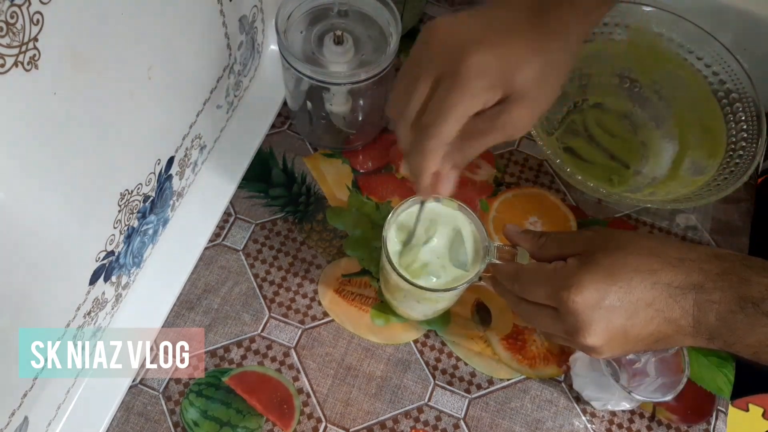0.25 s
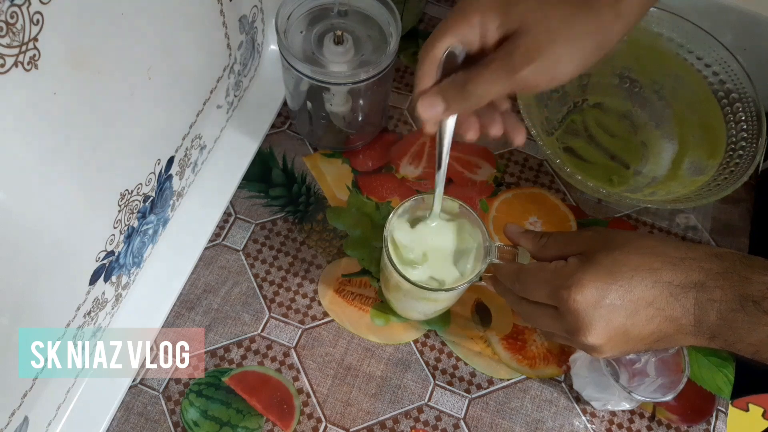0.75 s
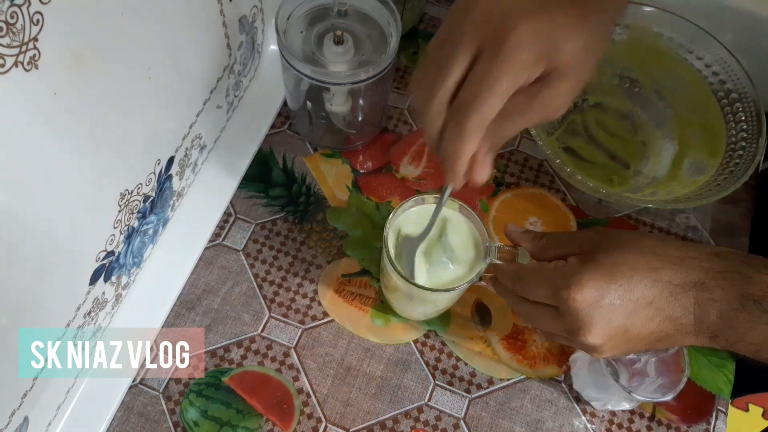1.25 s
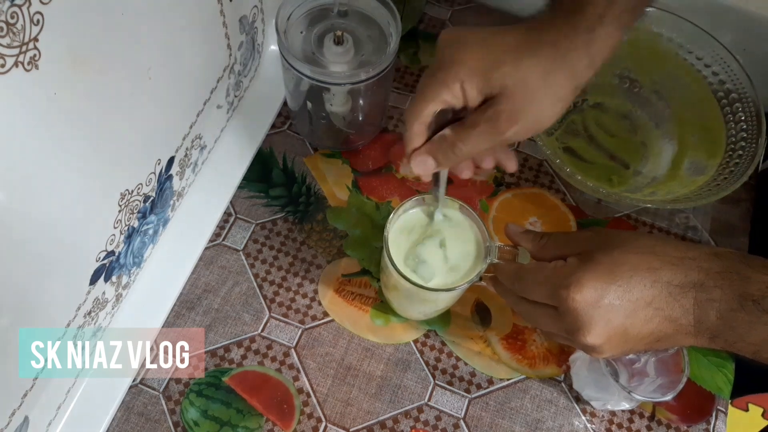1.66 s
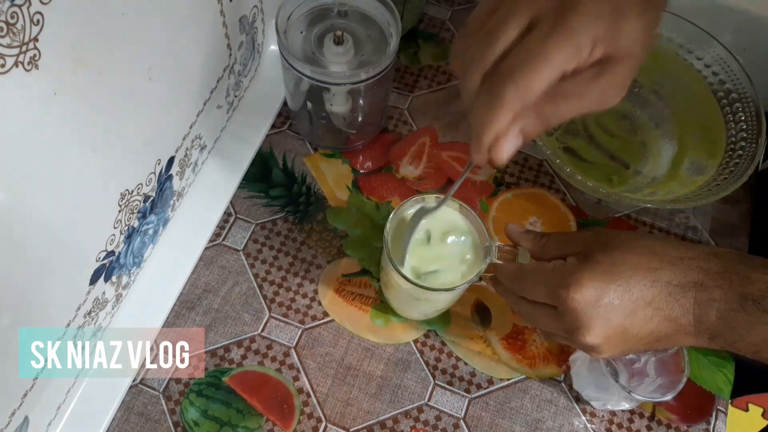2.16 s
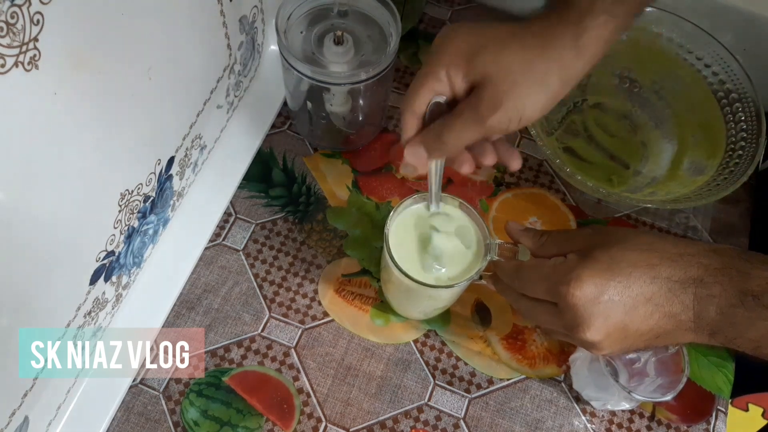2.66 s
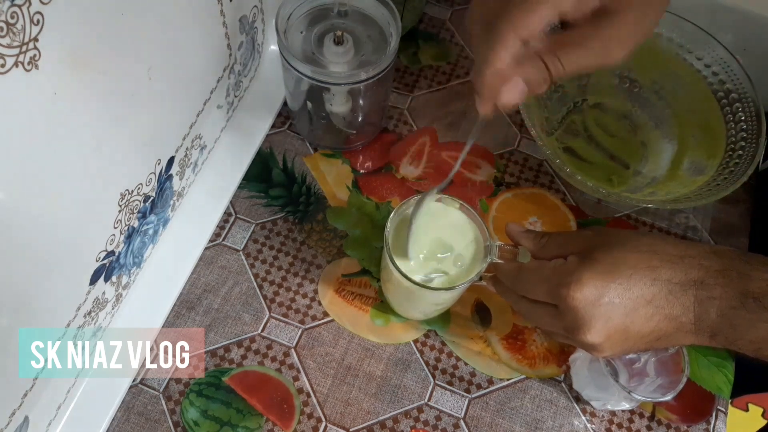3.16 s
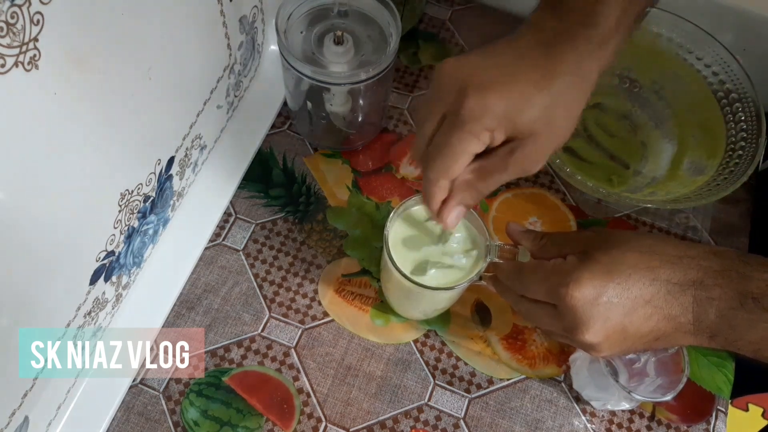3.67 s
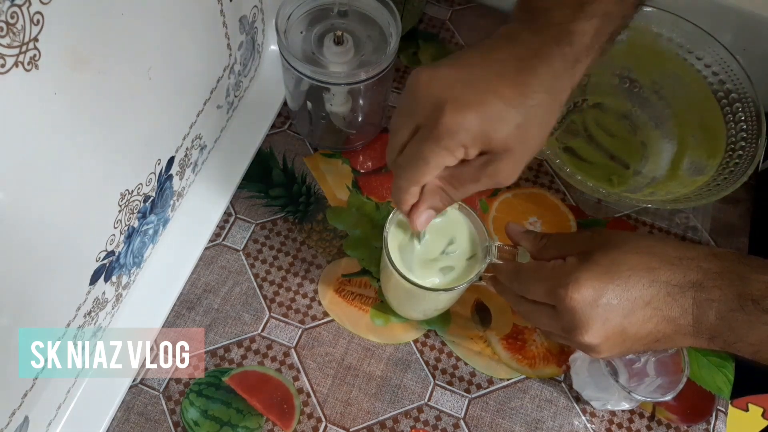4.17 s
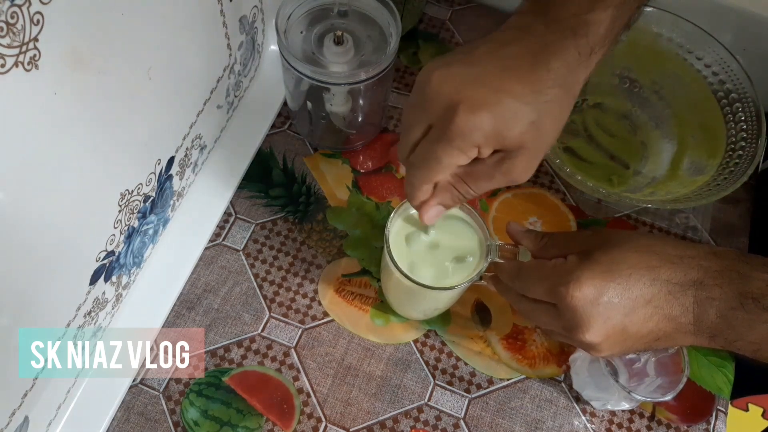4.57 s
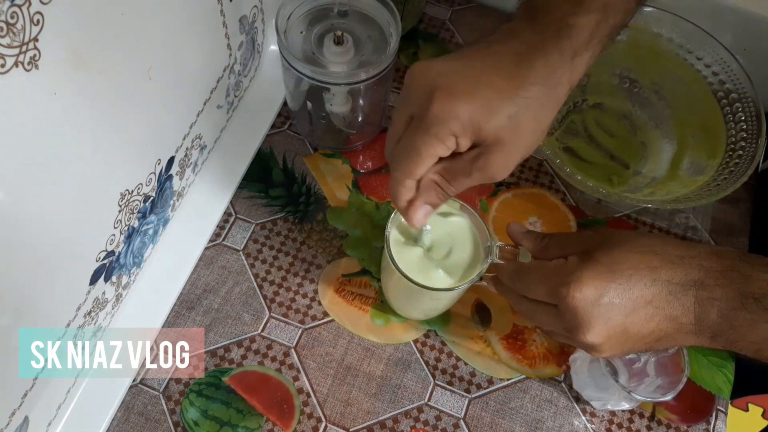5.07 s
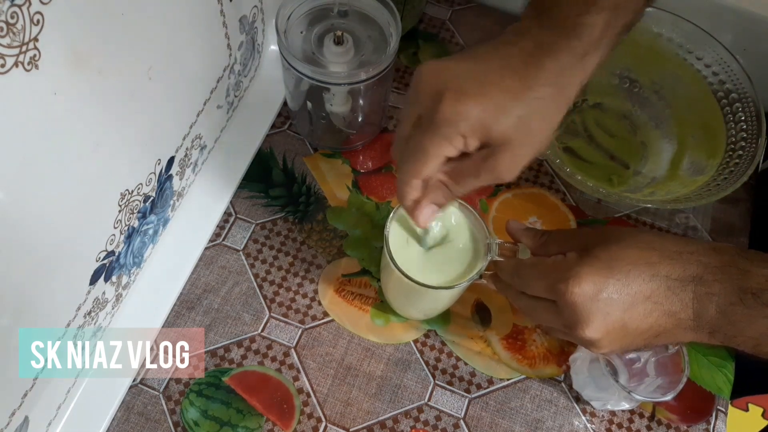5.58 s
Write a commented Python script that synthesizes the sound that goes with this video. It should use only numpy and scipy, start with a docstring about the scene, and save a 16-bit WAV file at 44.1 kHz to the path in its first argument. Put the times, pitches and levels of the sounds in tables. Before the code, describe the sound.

Spoon knocks on a filled glass, sparse at first and then quick and regular, over the constant low hum of an electric fan.

```python
"""Spoon stirring a thick drink in a glass mug

A steel spoon scoops up the wall of a hand-held mug, then from about 3.4 s circles on the bottom.
Knocks ring damped mug modes with a gritty crack and a skid; faint touches fall at random.
Scrapes are random slips ringing the modes, plus grit and tiny bubbles. Air pockets pop as rising tones
with a noise smack. An electric fan hums steadily: fixed tones over filtered noise."""
import sys
import numpy as np
from scipy import signal
from scipy.fft import rfft, irfft
from scipy.io import wavfile

SR = 44100
rng = np.random.default_rng(int(sys.argv[2]) if len(sys.argv) > 2 else 0)


def put_to_file(sound):
    """Save the sound as 16-bit audio at rate SR, in the file named by the first command-line argument."""
    columns = np.atleast_2d(sound).T  # one column per channel
    safe = np.clip(columns, -1, 1)
    whole_steps = np.round(safe * 32767)
    wavfile.write(sys.argv[1], SR, whole_steps.astype(np.int16))


N = 257544


def from_db(db):
    """Decibels to amplitude gain."""
    return 10 ** (np.asarray(db) / 20)


def rms_one(x):
    """Scale to rms 1."""
    return x / np.sqrt(np.mean(x ** 2) + 1e-20)


def at_hz(points, hz):
    """Interpolate a spectrum on a log-frequency axis."""
    point_hz, value = np.transpose(points)
    return np.interp(np.log(np.maximum(hz, 1)), np.log(point_hz), value)


def seconds(length_s):
    """Time axis in seconds."""
    return np.arange(int(length_s * SR)) / SR


def dying(t, t60_s):
    """Exponential decay, 60 dB down at t60_s."""
    return np.exp(-np.log(1000) * t / t60_s)


def add(out, start_s, sound):
    """Mix a sound in at start_s."""
    i = max(int(start_s * SR), 0)
    out[:, i:i + sound.shape[-1]] += sound[..., :N - i]


def band(x, low_hz, high_hz):
    """Causal band-pass."""
    edges_hz = [low_hz, min(high_hz, .45 * SR)]
    return signal.sosfilt(signal.butter(2, edges_hz, "band", fs=SR, output="sos"), x)


# likeness of the two channels in the air noise: hz, correlation
CHANNEL_LIKENESS = [(30, 0.6), (100, 1), (300, 0.91), (500, 0.77), (800, 0.55), (1500, 0.021), (4000, 0.21),
                    (16000, 0.1)]


def air_noise(spectrum):
    """Diffuse air: steady stereo noise, channels more alike in the bass than in the treble; rms 1."""
    hz = np.arange(N // 2 + 1) * SR / N
    mid, side = rfft(rng.standard_normal((2, N))) * from_db(at_hz(spectrum, hz))
    alike = np.clip(at_hz(CHANNEL_LIKENESS, hz), -1, .995)
    spectra = np.sqrt(1 + alike) * mid + np.sqrt(1 - alike) * side * [[1], [-1]]
    return rms_one(irfft(spectra, N))


# fan tones: order (multiple of FAN_HZ), level_db (rms)
FAN_ORDERS = [(2, -66), (4, -57.5), (6, -53), (10, -54), (11, -52.5), (12, -42), (13, -41.5), (14, -45),
              (15, -46.5), (19, -57), (35, -64), (36, -49), (37, -61), (38, -53.5)]
# rush of the fan: hz, density_db (relative, per Hz)
RUSH = [(25, -38), (60, -21.5), (100, -8), (170, -6), (225, -11), (275, 0.5), (330, -4.5), (390, -0.5),
        (440, -7.5), (620, -14), (790, -7), (950, -16.5), (1300, -19.5), (2200, -49)]
# far hiss of the moving air: hz, density_db (relative, per Hz)
HISS = [(600, -28.5), (1500, 14.5), (2500, 5), (4000, -8.5), (6000, -28), (9000, -21.5), (16000, -19)]
FAN_HZ = 22.062  # rotation rate
DRONE_HZ, DRONE_DB = 146.1, -51.5  # unrelated to the rotation


def fan(tones_db, rush_db, hiss_db):
    """Rotation gives steady tones at multiples of its rate; a drone and rushing air join them."""
    t = np.arange(N) / SR
    lines = [(order * FAN_HZ, db) for order, db in FAN_ORDERS] + [(DRONE_HZ, DRONE_DB)]
    tones = np.zeros(N)
    for hz, rms_db in lines:
        tones += np.sqrt(2) * from_db(rms_db) * np.sin(2 * np.pi * (hz * t + rng.random()))
    air = from_db(rush_db) * air_noise(RUSH) + from_db(hiss_db) * air_noise(HISS)
    return from_db(tones_db) * tones + air


# working depth of the spoon: time_s, depth (0 scooping up the wall, 1 circling on the bottom)
DEPTH = [(3.3, 0.13), (3.5, 0.82)]


def depth(time_s):
    """Spoon depth at time_s, 0 to 1."""
    return np.clip(np.interp(time_s, *np.transpose(DEPTH)), 0, 1)


# scrapes of the spoon on the glass: peak_s, level_db (relative)
SCRAPES = [(0.02, -51), (0.88, -47.5), (1.42, -58.5), (2.02, -49), (2.6, -53), (3.13, -55), (3.62, -51.5),
           (4.17, -49), (5.07, -44), (5.6, -50.5)]
SCRAPE_SWELL_DB_PER_S, SCRAPE_FADE_DB_PER_S = 67, 79
RUB_SCOOPING_DB, RUB_BOTTOM_DB = -67.5, -57  # relative, like the scrapes


def drag():
    """Gain of the friction: each scrape swells and fades above a rub that grows with depth."""
    t = np.arange(N) / SR
    levels_db = [RUB_SCOOPING_DB + depth(t) * (RUB_BOTTOM_DB - RUB_SCOOPING_DB)]
    for peak_s, level_db in SCRAPES:
        swell_db = SCRAPE_SWELL_DB_PER_S * (peak_s - t)
        fade_db = SCRAPE_FADE_DB_PER_S * (t - peak_s)
        levels_db.append(level_db - np.maximum(swell_db, fade_db))
    return from_db(np.max(levels_db, axis=0))


def random_clicks(per_s, size_db):
    """Impulses at random moments; size_db scales an exponential spread of levels, capped at 3 times."""
    at, clicks = np.flatnonzero(rng.random(N) < per_s / SR), np.zeros(N)
    clicks[at] = from_db(size_db * np.minimum(rng.exponential(1, len(at)), 3))
    return clicks


def ring_clicks(clicks, hz, t60_s):
    """Two-pole resonator: each unit click starts a decaying sine of height 1."""
    r, w = dying(1 / SR, t60_s), 2 * np.pi * hz / SR
    return signal.lfilter([0, np.sin(w)], [1, -2 * r * np.cos(w), r * r], clicks + 1e-18)


# mug and spoon modes, damped by drink and hands: hz (nominal), level_db (relative), t60_s
MUG_MODES = [(786, -8, 0.021), (1340, -12, 0.022), (1485, -11, 0.14), (1670, -2, 0.02), (1938, 1, 0.02),
             (2130, 0.5, 0.027), (2506, -3, 0.018), (2850, -2.5, 0.017), (3120, 0.5, 0.0057),
             (3750, -2, 0.02), (3878, -2.5, 0.021), (4410, 1.5, 0.008), (4890, -6.5, 0.022),
             (5246, -7, 0.031), (5746, -3.5, 0.017), (5915, -7, 0.019), (6420, -7, 0.0066),
             (7320, 0.5, 0.0093), (7680, 1.5, 0.016), (8420, 9, 0.007), (9320, -1.5, 0.011),
             (10530, -3, 0.0086), (10520, -2, 0.01), (14900, -12, .004)]
# borders between the low, middle, high and top mode families: hz
FAMILY_EDGES_HZ = [2600, 4600, 6600]


def scrape(wet_db, bubble_cycles, grit_db):
    """Steel slipping on wet glass softly rings the modes; tiny bubbles crackle in the spoon's wake."""
    slips = random_clicks(per_s=650, size_db=8.5) * rng.standard_normal((2, N))
    # a wet slip is too soft for the top modes
    soft_modes = [mode for mode in MUG_MODES if mode[0] < FAMILY_EDGES_HZ[-1]]
    glass = np.zeros((2, N))
    for k, (hz, db, t60_s) in enumerate(soft_modes):
        glass += (-1) ** k * from_db(db) * ring_clicks(slips, hz, t60_s)
    glass = band(glass, low_hz=1360, high_hz=5900)

    rubbing = random_clicks(per_s=6000, size_db=0.5) * rng.standard_normal((2, N))
    grit = band(rubbing, low_hz=2620, high_hz=8200)

    bursts = rng.standard_normal((2, N))
    bubbles = np.zeros((2, N))
    for hz in np.geomspace(3000, 5600, 16):
        bubble_clicks = random_clicks(per_s=21, size_db=5) * bursts
        bubbles += ring_clicks(bubble_clicks, hz, bubble_cycles / hz)
    sound = rms_one(glass) + from_db(grit_db) * rms_one(grit) + from_db(wet_db) * rms_one(bubbles)
    return sound * drag()


# family levels, rows low to top: scooping_db, bottom_db, struck_db (relative)
FAMILY_DB = [(-14.5, -9.5, -10.5), (-12, -13.5, -10), (-9.5, -8, -9), (-13, -14, -10.5)]
BRIGHTENING_DB_PER_DB, ORDINARY_KNOCK_DB = 0.11, -17.5


def family_levels(start_s, level_db, strongest_hz):
    """Depth sets the balance of families; the struck one has its own level; force lifts the top."""
    scooping_db, bottom_db, struck_db = np.transpose(FAMILY_DB)
    struck = np.arange(len(FAMILY_DB)) == np.searchsorted(FAMILY_EDGES_HZ, strongest_hz)
    by_depth_db = scooping_db + depth(start_s) * (bottom_db - scooping_db)
    family_db = np.where(struck, struck_db, by_depth_db)
    family_db[-1] += BRIGHTENING_DB_PER_DB * (level_db - ORDINARY_KNOCK_DB)
    return family_db


def mug_ring(t, family_db, strongest_hz, focus_db, focus_width, detune, uneven_db, spread_rad):
    """Contact place picks the modes; sloshing drink detunes them; each microphone has its own phases."""
    hz, mode_db, t60_s = np.transpose(MUG_MODES)
    near = 1 / (1 + (np.log(hz / strongest_hz) / focus_width) ** 2)
    level_db = mode_db + np.array(family_db)[np.searchsorted(FAMILY_EDGES_HZ, hz)]
    gain = from_db(level_db + focus_db * near + uneven_db * rng.standard_normal(len(hz)))
    pitch_hz = hz * (1 + detune * rng.standard_normal(len(hz)))
    phase = 2 * np.pi * rng.random(len(hz)) + spread_rad * rng.standard_normal((2, len(hz)))
    modes = np.exp(2j * np.pi * pitch_hz[:, None] * t) * dying(t, t60_s[:, None])
    return np.imag(gain * np.exp(1j * phase) @ modes)


def crack(t, family_db, t60_s, scatter_db, scatter_t60_s, low_hz, top_hz):
    """Gritty contact and its scatter from the moving hands: noise with the colour of the knock."""
    edges_hz = [low_hz, *FAMILY_EDGES_HZ, top_hz]
    envelope = dying(t, t60_s) + from_db(scatter_db) * dying(t, scatter_t60_s)
    burst = rng.standard_normal((2, len(t))) * envelope
    out = np.zeros((2, len(t)))
    for db, low, high in zip(family_db, edges_hz, edges_hz[1:]):
        equal_power = np.sqrt(SR / (high - low))  # offsets the band's width
        out += from_db(db) * band(burst, low, high) * equal_power
    return out


TOUCHES_PER_S, TOUCH_DB, TOUCH_SPREAD_DB, TOUCH_SKID_DB = 4, -31.5, 3, -4


def light_touches():
    """Faint contacts at random moments, forces and places, as rows like those of KNOCKS."""
    draws = rng.random((max(int(TOUCHES_PER_S * N / SR), 0), 3))
    mode_hz = [hz for hz, _, _ in MUG_MODES if hz < FAMILY_EDGES_HZ[-1]]
    rows = []
    for when, force, place in draws:
        level_db = TOUCH_DB + TOUCH_SPREAD_DB * (2 * force - 1)
        rows.append((when * N / SR, level_db, mode_hz[int(place * len(mode_hz))], TOUCH_SKID_DB))
    return rows


# spoon on glass: start_s, level_db (relative), strongest_hz (most excited), skid_db (re first contact)
KNOCKS = [(0.0197, -31.5, 3970, -19), (0.1404, -21, 4000, -5), (0.279, -30, 1660, -18),
          (0.3404, -17.5, 3530, -19), (0.4097, -15, 1670, -32), (0.452, -25.5, 1490, 2.5),
          (0.5294, -30, 1680, -17), (0.8208, -27, 2850, -3), (0.9141, -26, 3440, -7),
          (1.1853, -30, 1940, -15), (1.2223, -27.5, 4050, 3), (1.2293, -16.5, 4100, -6),
          (1.2383, -19.5, 4370, -1.5), (1.4287, -18, 6140, -6.5), (1.4851, -14.5, 1690, -32),
          (1.5504, -23.5, 6040, -2), (2.0047, -25, 4380, -0.5), (2.2437, -14, 4440, -4.5),
          (2.4017, -14, 5900, -33), (2.4697, -12, 1900, -29), (2.5484, -24.5, 1670, -7),
          (2.5954, -7.5, 5600, -14), (2.6064, -13, 4960, -2), (2.9736, -28, 4400, -24),
          (3.057, -27.5, 4240, -25), (3.179, -26, 4070, -30), (3.2839, -22, 4300, -4),
          (3.3397, -20, 4160, -11), (3.4552, -14, 5900, -6), (3.534, -15.5, 1880, -21),
          (3.5625, -27, 1470, -20), (3.674, -30, 4030, 4.5), (3.7292, -29, 1560, 0),
          (3.958, -13, 5240, -10), (4.1581, -21, 3760, 0), (4.304, -10, 5840, -8), (4.4452, -28, 2000, -18),
          (4.4927, -24.5, 2180, -31), (4.5975, -15.5, 5700, -7), (4.7061, -25, 1680, -26),
          (4.812, -25, 2140, -6), (4.8811, -25, 6200, 6), (4.8866, -15.5, 5900, 2), (4.996, -24, 1980, -11),
          (5.1808, -12.5, 5300, -8), (5.227, -21, 1490, -5), (5.2636, -21, 5330, -10), (5.38, -24, 2280, 0),
          (5.466, -13, 5600, -7), (5.658, -21, 5100, -25), (5.7374, -16, 5200, 0.5),
          (5.7487, -20.5, 1460, -18), (5.787, -21.5, 8200, -21)]


def knocks(rise_s, crack_db, skid_s, skid_per_s):
    """The spoon strikes, rebounds and skids: a cluster of random touches, strongest around skid_s."""
    out, t = np.zeros((2, N)), seconds(.15)
    for start_s, level_db, strongest_hz, skid_db in KNOCKS + light_touches():
        family_db = family_levels(start_s, level_db, strongest_hz)
        ring = mug_ring(t, family_db, strongest_hz, focus_db=9.5, focus_width=0.064,
                        detune=0.024, uneven_db=1.0, spread_rad=0.92)
        grit = crack(t, family_db, t60_s=0.017, scatter_db=-19.0, scatter_t60_s=0.082,
                     low_hz=780, top_hz=13900)
        touch = (ring + from_db(crack_db) * grit) * (1 - np.exp(-t / rise_s))
        skid = (rng.random(len(t)) < skid_per_s / SR) * rng.standard_normal(len(t))
        skid *= (t / skid_s * np.exp(-t / skid_s)) ** 2
        touches = from_db(skid_db) * skid / np.sqrt(np.sum(skid ** 2) + 1e-20)
        touches[0] = 1  # first contact
        add(out, start_s, from_db(level_db) * signal.fftconvolve(touch, touches[None]))
    return out


# air pockets bursting in the drink: start_s, level_db (relative), pitch_hz (at onset)
POPS = [(0.689, -32.5, 3740), (0.833, -23.5, 2830), (0.914, -14, 4030), (0.9457, -20, 2290),
        (0.977, -18, 2540), (1.3019, -27.5, 2860), (1.658, -26, 2720), (1.9791, -13.5, 4000),
        (2.742, -34, 3990), (2.834, -27.5, 3860), (2.939, -31, 3880), (3.018, -25.5, 3160)]


def pops(rise_s, t60_s, glide_per_s, smack_db, smack_t60_s):
    """An air pocket tears open with a wet smack and rings briefly, rising in pitch."""
    out, t = np.zeros((2, N)), seconds(0.066)
    for start_s, level_db, pitch_hz in POPS:
        cycles = pitch_hz * (t + glide_per_s / 2 * t * t) + rng.random((2, 1)) / 4
        tone = dying(t, t60_s) * np.sin(2 * np.pi * cycles)
        burst = rng.standard_normal((2, len(t))) * dying(t, smack_t60_s)
        smack = band(burst, pitch_hz / 2.0, pitch_hz * 1.28)
        pop = (1 - np.exp(-t / rise_s)) * (tone + from_db(smack_db) * smack)
        add(out, start_s, from_db(level_db) * pop)
    return out


def kitchen(x, echo_s, echo_db, early_db, early_t60_s, late_db, late_t60_s):
    """One faint wall echo, dense scatter from table and dishes, and the room's tail."""
    t = seconds(0.76)
    early, late = rng.standard_normal((2, 2, len(t))) * (t > .003)
    early = band(early * dying(t, early_t60_s), low_hz=680, high_hz=15600)
    late = band(late * dying(t, late_t60_s), low_hz=496, high_hz=10200)
    response = from_db(early_db) * rms_one(early) + from_db(late_db) * rms_one(late)
    response /= np.sqrt(len(t))
    response[:, 0] += 1  # direct sound
    response[:, int(echo_s * SR)] += from_db(echo_db)
    return np.array([signal.fftconvolve(side, echoes)[:N] for side, echoes in zip(x, response)])


def scene():
    """Stirring in the kitchen's echoes, plus the fan."""
    hum = fan(tones_db=0, rush_db=-35.0, hiss_db=-48.5)
    stirring = from_db(-0.38) * knocks(rise_s=0.00061, crack_db=-2.0, skid_s=0.0065, skid_per_s=380)
    stirring += from_db(-1.0) * scrape(wet_db=0.5, bubble_cycles=30, grit_db=-2.5)
    stirring += from_db(2.5) * pops(rise_s=0.0018, t60_s=.016, glide_per_s=7.4,
                                    smack_db=1.5, smack_t60_s=0.017)
    return hum + kitchen(stirring, echo_s=.0112, echo_db=-39, early_db=-12.5, early_t60_s=0.16,
                         late_db=-12.5, late_t60_s=0.3)


# left microphone against the right: hz, gain_db
LEFT_PORT = [(500, 0.5), (1500, -1.5), (2200, -2), (4200, 3), (5800, 3.5), (6600, -1.5), (7500, -6),
             (8500, -22), (11000, -8), (16000, -6.5)]
CUTOFF_HZ = 16000


def record(dry):
    """The left microphone's port lifts 4 to 6 kHz and dulls the treble above; both are low-passed."""
    size = 2 * N
    log_gain = np.log(from_db(at_hz(LEFT_PORT, np.arange(N + 1) * SR / size)))
    cepstrum = irfft(log_gain)[:N]
    cepstrum[1:] *= 2  # minimum phase: the port rings only after the sound arrives
    left = irfft(rfft(dry[0], size) * np.exp(rfft(cepstrum, size)))[:N]
    low_pass = signal.ellip(10, .2, 80, CUTOFF_HZ, fs=SR, output="sos")
    return signal.sosfilt(low_pass, np.array([left, dry[1]]))


dry = scene()
out = record(dry)
put_to_file(out)
```